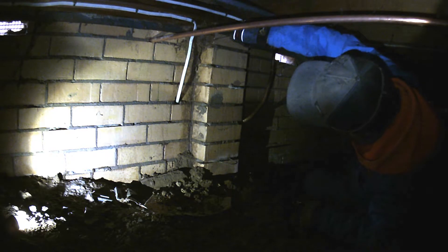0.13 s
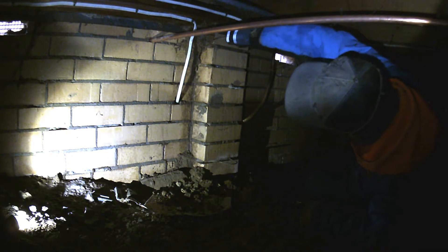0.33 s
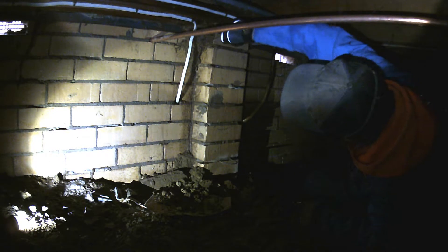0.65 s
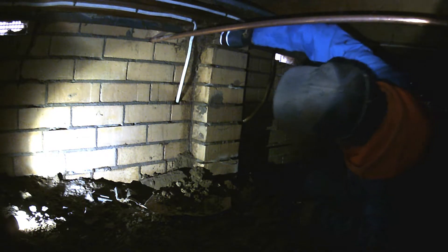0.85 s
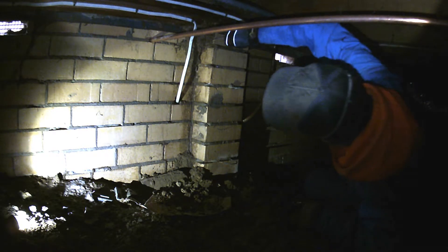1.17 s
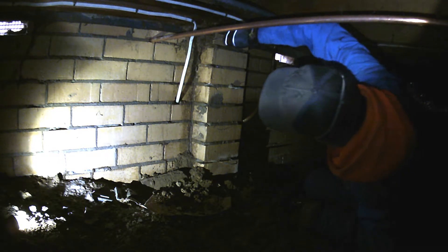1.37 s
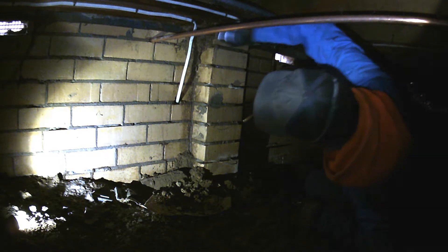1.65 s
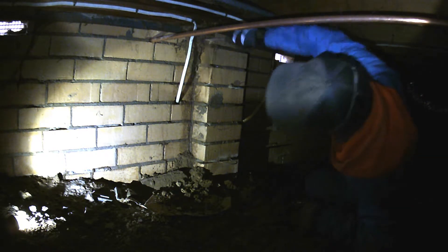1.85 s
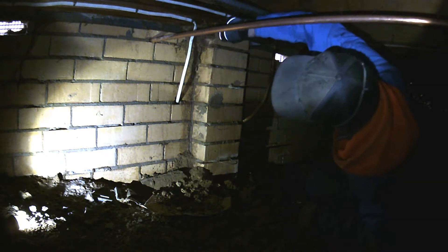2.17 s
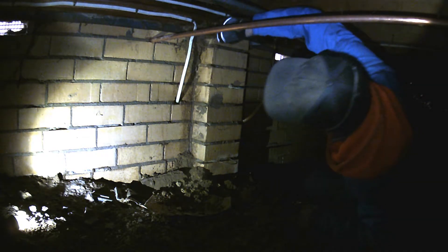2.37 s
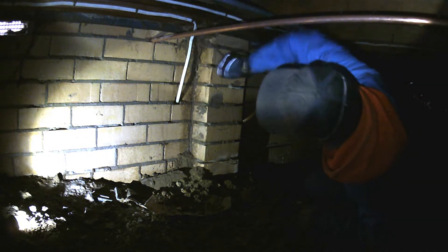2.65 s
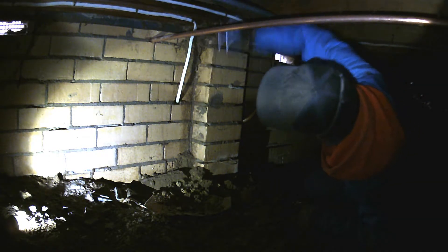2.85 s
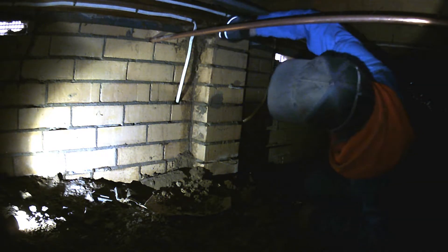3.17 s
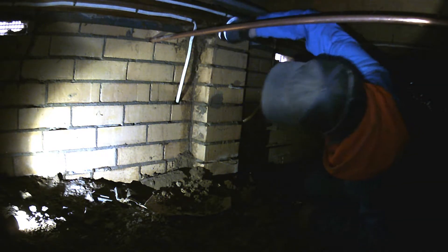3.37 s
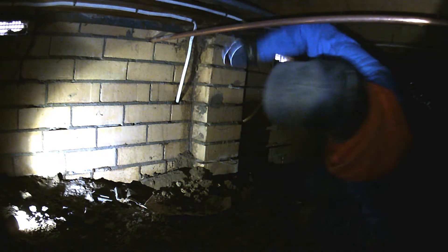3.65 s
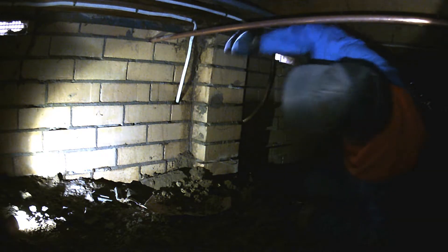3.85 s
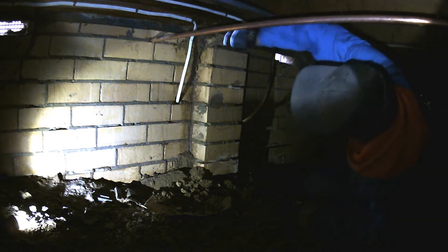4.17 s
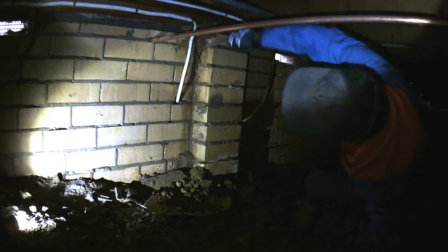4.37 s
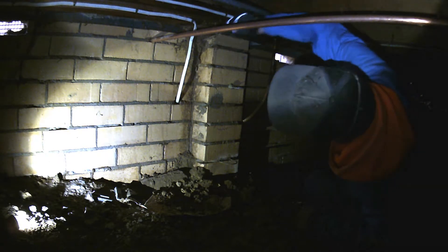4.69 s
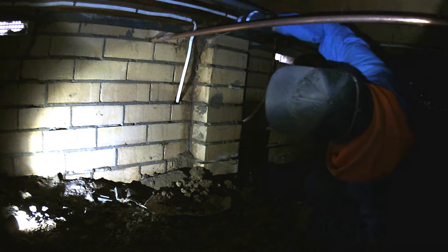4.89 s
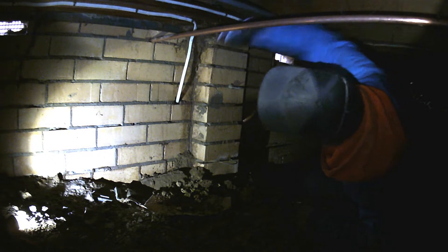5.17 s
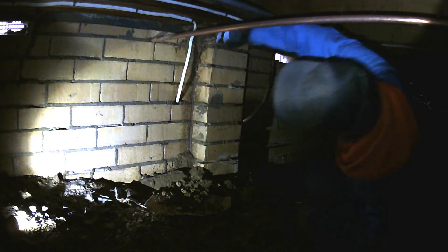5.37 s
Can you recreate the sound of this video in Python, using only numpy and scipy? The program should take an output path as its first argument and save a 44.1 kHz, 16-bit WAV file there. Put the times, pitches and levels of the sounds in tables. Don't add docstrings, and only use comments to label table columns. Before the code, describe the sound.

Dried mud snaps and crackles off brick under a gloved hand, muffled and boxy, over a steady low motor hum underground.

```python
import sys
import numpy as np
from scipy import signal
from scipy.fft import rfft, irfft, next_fast_len
from scipy.io import wavfile
from scipy.ndimage import map_coordinates

SR = 44100
rng = np.random.default_rng(int(sys.argv[2]) if len(sys.argv) > 2 else 0)


def volts_from_db(level):
    exponent = np.asarray(level, float) / 20
    return 10 ** exponent


def transcribe(signal):
    frames = np.atleast_2d(signal).T
    limited = np.clip(frames, -1, 1)
    pcm = np.round(limited * 32767).astype(np.int16)
    wavfile.write(sys.argv[1], SR, pcm)


N = 243873

# (frequency [Hz], width [Hz], level [dB])
SHELL = [(290, 60, -11), (444.4, 46, -6), (600.7, 76, -2.5), (781, 52, -3), (900.6, 67.6, 1),
         (1050, 174, -3.5), (1344, 178, -2), (1566, 380, -7), (1898, 80, -13.5)]
# (frequency [Hz], density [dB per Hz])
GRIT = [(1500, -26.5), (1950, 6), (2500, -6.5), (3300, -9.5), (4000, -17.5), (4500, -28), (5200, -33.5),
        (5800, -59.5)]
# (frequency [Hz], density [dB per Hz])
PORT = [(5200, -32.5), (6000, -15.5), (6600, -8.5), (7300, -6), (8000, -12), (8700, -29), (9200, -70)]
SHELL_HZ = np.transpose(SHELL)[0]
HUSH_S = 0.003
CRUST_PER_THIN = 0.86


def unit(x):
    return x / np.sqrt(np.mean(x ** 2) + 1e-20)


def along(points, hz):
    f, v = np.transpose(points)
    return np.interp(np.log(hz + 1), np.log(f + 1), v)


def wobble(rate):
    knots = rng.standard_normal(int(N * rate / SR) + 4)
    return map_coordinates(knots, [np.arange(N) * rate / SR])


def filtered(x, response):
    m = next_fast_len(len(x) + SR // 16)
    gain = response(np.fft.rfftfreq(m, 1 / SR))
    gain = gain / np.sqrt(np.mean(np.abs(gain) ** 2))
    return irfft(rfft(x, m) * gain, m)[:len(x)]


def colour(points):
    closed = points + [(points[-1][0] * 1.2, -120)]
    return lambda hz: volts_from_db(along(closed, hz))


def shell(extra_db):
    centre, width, db = np.transpose(SHELL)[:, :, None]
    sign = (-1) ** np.arange(len(SHELL))[:, None]
    strength = sign * volts_from_db(db + extra_db[:, None])

    def response(f):
        damping = 1j * f * width
        modes = np.sum(strength * damping / (centre * centre - f * f + damping), axis=0)
        mass = 1 / (1 + 1j * f / 1450 - (f / 2000) ** 2) ** 2
        stiffness = (1j * f / 200) / (1 + 1j * f / 200)
        return modes * mass * stiffness ** 2
    return response


def mode_lift(deep_db, thin_db):
    return np.where(SHELL_HZ < 700, deep_db, np.where(SHELL_HZ > 1150, thin_db, 0))


def dry_mud(dry_db):
    return -3 - 0.67 * dry_db, -6 + 0.87 * dry_db


def burst(t60, rise, rough_db):
    t = np.arange(SR // 9) / SR
    lumps = np.repeat(rng.standard_normal(len(t) // 64 + 1), 64)[:len(t)]
    envelope = volts_from_db(rough_db * lumps - 60 * t / t60) * (1 - np.exp(-t / rise))
    force = rng.standard_normal(len(t)) * envelope
    return np.pad(force, (round(HUSH_S * SR), 0))


def laid(pieces):
    out = np.zeros(N + SR)
    for s, piece, db in pieces:
        out[round(s * SR):][:len(piece)] += piece * volts_from_db(db) / np.abs(piece).max()
    return out[:N]


def motor():
    # (order [turns], level [dB rms])
    orders = [(1, -37.5), (2, -29), (3, -79), (5, -52.5), (6, -53.5), (7, -59.5), (8, -56.5), (9, -72)]
    shaft_hz = 26.68
    turn = 2 * np.pi * shaft_hz * np.arange(N) / SR + 0.33 * wobble(1.498)
    hum = np.zeros(N)
    for k, db in orders:
        strength = np.sqrt(2) * volts_from_db(db + 1.4 * wobble(6.6))
        hum += strength * np.cos(round(k) * turn + 0.6867 * k * k)
    return hum


def floor():
    # (frequency [Hz], density [dB per Hz])
    ground = [(8, -33.5), (15, 14.5), (38, 4), (65, 6.5), (100, -0.5), (160, -3), (230, -11.5), (350, -18),
              (480, -16.5), (800, -25), (1600, -32), (2500, -41.5), (3900, -51.5), (4700, -65.5)]
    # (frequency [Hz], density [dB per Hz])
    hiss = [(4500, -19.5), (5400, -17), (6100, -11.5), (6700, -2), (7400, -15.5), (8200, -20.5),
            (8900, -28.5), (9300, -70)]
    rumble = filtered(rng.standard_normal(N) * volts_from_db(0.3 * wobble(9.3)), colour(ground))
    return volts_from_db(-38.0) * rumble + volts_from_db(-82.5) * filtered(rng.standard_normal(N), colour(hiss))


def rubbing():
    # (time [s], pressure as crumble [dB], sliding speed as grit [dB])
    rub = [(0, -56.5, -78), (.88, -56, -79.5), (.97, -49, -60), (1.31, -60, -82.5), (1.618, -49.5, -77),
           (1.849, -48, -75), (2.06, -41, -59), (2.12, -51, -65), (2.42, -54, -74.5), (2.789, -44.5, -69),
           (2.881, -50.5, -67.5), (3.7, -50, -78.5), (3.77, -51.5, -60.5), (3.991, -54, -83),
           (4.36, -44.5, -74), (4.561, -60, -80.5), (5.072, -67.5, -83), (5.25, -58.5, -82)]
    s, *levels = np.transpose(rub)
    crumble_db, grit_db = [np.interp(np.arange(N) / SR, s, level) for level in levels]
    rustle_db = -87 + 0.58 * (grit_db + 78)
    clumps = 2.5 * wobble(45) + 3.5 * wobble(220)

    def grains(depth):
        return unit(rng.standard_normal(N) * volts_from_db(depth * clumps))
    body = volts_from_db(crumble_db - 6.5) * filtered(grains(0.92), shell(np.zeros(len(SHELL))))
    grit = volts_from_db(grit_db - 5.5) * filtered(grains(0.74), colour(GRIT))
    rustle = volts_from_db(rustle_db + 0.5) * filtered(grains(0.87), colour(PORT))
    return body + grit + rustle


def spits():
    # (time [s], peak [dB])
    bursts = [(.1184, -65.5), (1.0085, -64), (1.3588, -71), (1.6724, -65), (2.002, -62), (2.0287, -58.5),
              (2.0445, -51), (2.064, -54.5), (2.165, -72), (2.389, -63), (2.7485, -79), (2.805, -59.5),
              (2.841, -65), (2.8609, -56.5), (3.02, -63.5), (3.1123, -68.5), (3.1432, -64), (3.163, -63),
              (3.1887, -63.5), (3.252, -64), (3.3296, -62.5), (3.464, -67), (3.4937, -70), (3.667, -59.5),
              (3.7519, -66), (3.8236, -64), (4.4897, -68), (5.084, -65), (5.119, -68)]
    pieces = []
    for s, db in bursts:
        dust = burst(t60=0.052, rise=0.0041, rough_db=2.5)
        pieces.append((s - HUSH_S - 0.001, filtered(dust, colour(PORT)), db + 1.5))
    return laid(pieces)


def breaks():
    # (time [s], peak [dB], deep modes [dB], thin modes [dB], t60 [s])
    tubes = [(0.1198, -15, 4, -5.5, 0.061), (1.644, -27, 7, -8, 0.29), (1.659, -25, 0, -8, 0.31),
             (1.84, -32, 2.5, -1, 0.021), (1.851, -21.5, -3.5, -6, 0.11), (1.875, -27.5, 10, -3, .19),
             (1.984, -19.5, -1.5, -11, 0.035), (2.005, -28, 0, -5, 0.035), (2.02, -15, -6.5, -5, 0.13),
             (2.038, -16, -21, -6, 0.087), (2.054, -12, -3.5, 0, 0.1), (2.803, -9, 4, -1.5, .3),
             (2.845, -20.5, -2, -1, 0.16), (2.862, -25, 0.5, -9, 0.29), (2.898, -30, 6.5, -.5, 0.14),
             (3.142, -27, -3, -6, 0.07), (3.164, -25, -21.5, -7.5, 0.058), (3.424, -26, 3.5, -9, 0.17),
             (4.103, -26, 3.5, -7, 0.11), (4.364, -22.5, 7.5, -5, 0.13), (4.492, -25.5, 3.5, -1.5, 0.21),
             (5.083, -19, -1, -5, 0.27), (5.115, -12.5, -2, -6, 0.19), (5.14, -31.5, 5, -29, 0.22)]
    # (time [s], peak [dB], dryness [dB], t60
    # [s])
    more_breaks = [(0.163, -33, -3.5, 0.1), (.204, -38, 3, 0.14), (.374, -37, -9, .1), (1.015, -39, 7, 0.15),
                   (1.102, -34, -10, .22), (1.592, -34.5, -2, .15), (1.677, -23, -10.5, 0.11),
                   (1.7, -32, -9, 0.12), (1.915, -39, -10, 0.19), (2.105, -33, 4, 0.084), (2.311, -28, 2, 0.055),
                   (2.364, -33, 3.5, 0.14), (2.386, -30.5, 4, 0.16), (2.518, -31.5, 1, 0.16),
                   (3.007, -35.5, 18, 0.17), (3.084, -37.5, 8, 0.13), (3.117, -36, -1.5, 0.17),
                   (3.246, -33.5, 7, 0.18), (3.274, -31, -1, 0.061), (3.294, -30.5, 8.5, 0.1),
                   (3.403, -36, -5, 0.045), (3.46, -31.5, -3, 0.25), (3.592, -32.5, -4.5, 0.091),
                   (3.666, -32.5, 5.5, 0.2), (3.756, -32.5, 12, 0.087), (3.834, -30.5, 0, 0.14),
                   (4.35, -30, 6, 0.039), (4.913, -34.5, -3.5, 0.089), (5.217, -40.5, -11, .2),
                   (5.461, -32, -9.5, 0.074)]
    return tubes + [(s, db, *dry_mud(dry_db), t60) for s, db, dry_db, t60 in more_breaks]


def snaps():
    pieces = []
    for s, db, deep_db, thin_db, t60 in breaks():
        brittle_db = -23.5 + CRUST_PER_THIN * thin_db - 0.48 * (db + 35)
        life = np.clip(0.45 * t60, 0.008, 0.12)
        blow = burst(life, rise=0.015 * life + 0.00055, rough_db=2.0)
        blow[round((HUSH_S + 0.001) * SR)] += 4.6
        crust = burst(1.2 * life, rise=0.00069, rough_db=-2.0)
        extra_db = mode_lift(deep_db + 2.5, thin_db + 2.5) + rng.normal(0, 1.0, len(SHELL))
        pieces.append((s - HUSH_S - 0.002, filtered(blow, shell(extra_db)), db - 3.05))
        pieces.append((s - HUSH_S - 0.001, filtered(crust, colour(GRIT)), db + brittle_db + 7.0))
    return laid(pieces)


def ticks():
    spikes = [.1245, .163, .326, .3595, .536, .726, .764, .927, .971]
    cycle_s, jitter_s, level_db, scatter_db = 1, 0.0027, -59.5, 1.1
    t = np.arange(200) / SR
    ring = np.sin(2 * np.pi * 6700 * t) * volts_from_db(-60 * t / 0.0036) * (1 - np.exp(-t / 0.0004)) ** 2
    times = np.add.outer(cycle_s * np.arange(6), spikes).ravel()
    times = times[times < N / SR]
    late, hard = rng.standard_normal((len(times), 2)).T
    times = times + jitter_s * late
    levels_db = level_db + scatter_db * hard
    return laid([(s, ring, db) for s, db in zip(times, levels_db)])


def scrapes():
    # (time [s], length [s], level [dB rms], dryness [dB])
    drags = [(0.191, 0.052, -47, 5.5), (.452, 0.065, -60, 6), (0.878, 0.018, -52, 2),
             (0.912, .21, -50.5, 5.5), (1.785, 0.075, -53, -8.5), (1.883, .04, -45, 1),
             (2.188, 0.044, -52.5, -7), (2.53, 0.096, -47.5, 1), (2.596, 0.082, -46.5, -5),
             (2.743, 0.018, -51.5, 0), (2.959, 0.055, -52, 7), (3.187, 0.04, -56.5, 8.5),
             (3.328, 0.032, -50, 1.5), (3.602, 0.029, -47.5, -4.5), (3.755, .1, -48.5, 9.5),
             (3.957, 0.026, -52, -2), (4.124, 0.027, -43, -6.5), (4.188, 0.1, -45.5, 3),
             (4.385, 0.06, -50.5, 0.5), (5.398, 0.024, -50.5, 6)]
    attack_s, t60_s = 0.005, 0.08
    t, out = np.arange(SR // 2) / SR, np.zeros(N + SR)
    jerks = volts_from_db(1.8 * wobble(80) + 3.3 * wobble(400))
    force = unit(jerks * rng.standard_normal((2, N)))
    force = np.pad(force, ((0, 0), (0, SR)))
    for s, length, db, dry_db in drags:
        deep_db, thin_db = dry_mud(dry_db)
        extra_db = mode_lift(deep_db + 6.0, thin_db + 2.5)
        release_db = -60 * np.maximum(t - length, 0) / t60_s
        stroke = (1 - np.exp(-t / attack_s)) * volts_from_db(db + release_db)
        body, crust = stroke * force[:, round(s * SR):][:, :len(t)]
        crust_db = -19 + CRUST_PER_THIN * thin_db
        drag = filtered(body, shell(extra_db)) + volts_from_db(crust_db) * filtered(crust, colour(GRIT))
        out[round(s * SR):][:len(t)] += drag
    return out[:N]


def thuds():
    # (time [s], peak [dB], frequency [Hz], t60 [s])
    pushes = [(1.656, -39, 247, 0.21), (2.388, -40, 247, 0.18), (2.813, -30, 241, 0.23),
              (2.83, -33.5, 169.9, 0.27), (2.931, -47.5, 104, 0.22), (3.421, -37, 249, 0.16),
              (3.652, -32.5, 80.6, 0.43), (4.11, -37.5, 138.7, 0.3), (4.13, -29, 87, 0.15),
              (5.09, -36.5, 256, 0.093), (5.091, -28, 78, 0.33), (5.118, -26.5, 130.5, 0.098)]
    t = np.arange(SR // 4) / SR
    pieces = []
    for s, db, hz, t60 in pushes:
        envelope = volts_from_db(-60 * t / t60) * (1 - np.exp(-t / 0.0032))
        pieces.append((s, np.sin(2 * np.pi * hz * t) * envelope, db))
    return laid(pieces)


def crawlspace(x):
    # (frequency [Hz], t60 [s])
    decay = [(200, 0.11), (1000, 0.066), (4000, 0.073), (9000, 0.007)]
    hz, t, z = signal.stft(rng.standard_normal(SR // 3), SR, nperseg=256)
    fade = volts_from_db(-60 * t / along(decay, hz)[:, None])
    tail = signal.istft(z * fade, SR, nperseg=256)[1]
    delayed = np.pad(x, (200, 0))
    return signal.fftconvolve(delayed, tail / np.linalg.norm(tail))[:N]


def scene():
    background = motor() + floor() + ticks()
    hand = spits() + snaps() + scrapes()
    echo = volts_from_db(-11.5) * crawlspace(hand)
    return (background + rubbing() + hand + echo + thuds())[None]


def top_cut(x):
    return signal.sosfilt(signal.butter(12, 8900, fs=SR, output="sos"), x)


def record(dry):
    return top_cut(dry)


dry = scene()
out = record(dry)
transcribe(out)
```